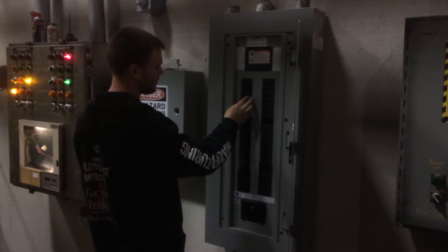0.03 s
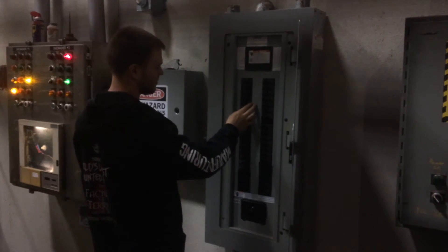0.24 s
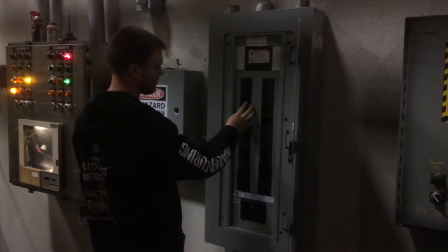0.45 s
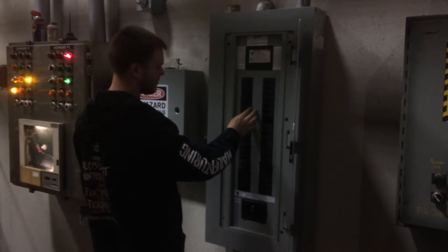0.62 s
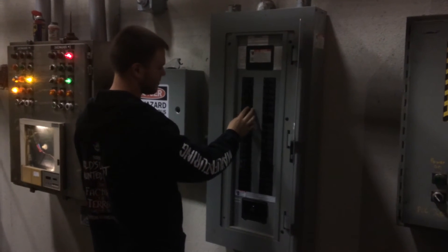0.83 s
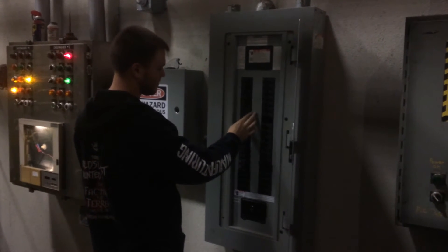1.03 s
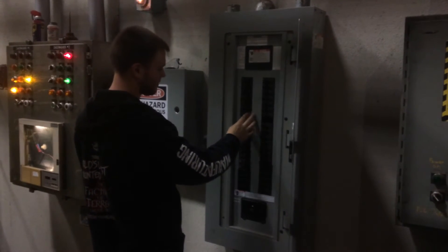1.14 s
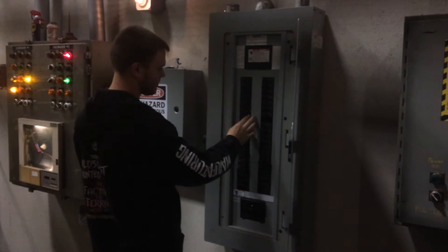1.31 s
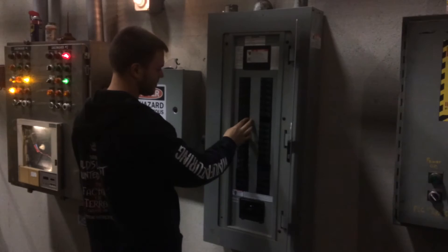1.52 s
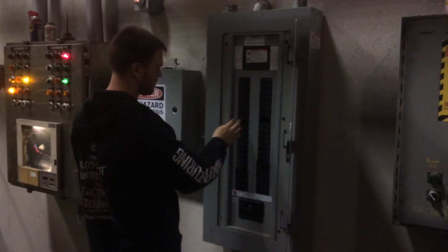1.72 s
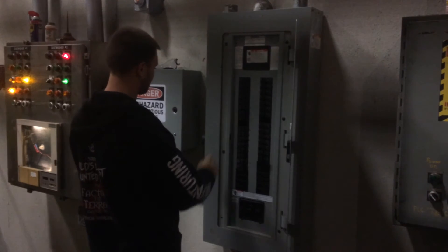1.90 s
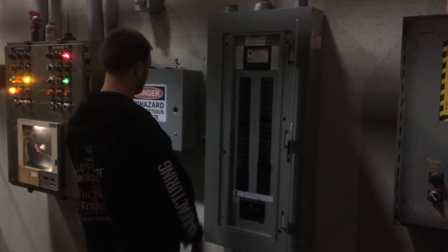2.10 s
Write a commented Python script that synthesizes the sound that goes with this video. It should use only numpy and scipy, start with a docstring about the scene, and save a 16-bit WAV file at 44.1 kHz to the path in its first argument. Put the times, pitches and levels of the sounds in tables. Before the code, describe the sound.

Five circuit breakers are flipped one after another at an even pace. Each sharp plastic clack makes the steel cabinet thump and ring faintly, with a short echo in a hard-walled room over a faint ventilation hum.

```python
"""In a hard-walled room, five circuit breakers are flipped one after another on a steel panel.
Each toggle lets go with a tick, snaps home a few milliseconds later and bounces once.
The plastic case clacks, and the steel cabinet thumps and rings.
The room answers with a short echo, over a faint ventilation hum."""
import sys
import numpy as np
from scipy import signal
from scipy.fft import rfft, irfft
from scipy.io import wavfile

SR = 44100
rng = np.random.default_rng(int(sys.argv[2]) if len(sys.argv) > 2 else 0)


def output_pcm(signal):
    """Save a mono or channel-first signal as 16-bit PCM at the path in sys.argv[1].

    Samples are clipped to [-1, 1] before scaling.
    """
    pcm = np.clip(np.atleast_2d(signal).T, -1, 1) * 32767
    wavfile.write(sys.argv[1], SR, np.round(pcm).astype(np.int16))


N = 94815

# The flips. Each row: snap time in seconds, level in dB, boosts in dB for the middle, upper middle,
# presence and top bands, bounce delay in seconds, bounce level in dB, room level in dB.
FLIPS = [(0.1148, -1, 0.5, 1.5, -0.5, 1.5, .0033, -4.5, -0.5),
         (0.4729, -1, 0, 1, -0.5, 4.5, .0016, -5.5, -2), (0.8866, -0.5, -1, -3, -2, -1, .0027, -3.5, 0),
         (1.2673, 0, 1, 1, -0.5, 0.5, .0040, -6.5, -1), (1.6294, -2, 0.5, -7, -2.5, 1, .0027, -1.5, 3.5)]
# Band centres in Hz: bass, middle, upper middle, presence, treble, top.
BAND_HZ = (400, 1500, 2800, 4800, 8200, 13000)
# Pitches that stand out, one list per breaker. Each pair: pitch in Hz, boost in dB.
RESONANCES = [
    [(2700, 5), (3650, 6), (4830, 7), (6190, 5), (7250, 4), (8230, 5)],
    [(1060, 0.5), (2670, 6), (4100, 8.5), (4950, 6), (8700, 5.5), (9400, 3)],
    [(3430, 8), (4370, 7), (4920, 5), (6800, 4), (8250, 1), (10700, 3.5)],
    [(1800, 3), (2830, 1), (5680, 8.5), (7220, 6.5), (8150, 1), (9950, 2.5)],
    [(1790, 7), (3900, 5.5), (4950, 6.5), (5330, 0), (6950, 4.5), (8850, 4)],
]
# The tone of the plastic case. Each row: pitch in Hz, level in dB.
CASE_TONE = [(150, -9.5), (600, -16), (1050, -7.5), (2000, -6), (3200, -8), (4600, -3), (8000, 2),
             (11000, 2), (15000, -3)]
# How long the case rings. Each row: pitch in Hz, fade time (to fall by 60 dB) in seconds.
CASE_FADES = [(300, 0.063), (1200, 0.057), (4000, 0.035), (14000, 0.02)]
# Clear notes that all the cases share. Each row: pitch in Hz, level in dB, fade time in seconds.
CASE_NOTES = [(1037, -32, 0.042), (1802, -37.5, 0.1), (2634, -32.5, 0.11), (4380, -32.5, 0.036),
              (4846, -31.5, 0.088), (5800, -26, 0.054), (7100, -25.5, .05), (8090, -21, 0.073),
              (8850, -39, 0.023), (10490, -21, .04), (12800, -24, 0.042)]
# The cabinet's steel. Each row: pitch in Hz, level in dB, fade time in seconds.
STEEL_NOTES = [(2760, -57, 0.64), (3470, -52, 0.72), (4790, -56, 0.71), (4930, -51, 0.87), (5800, -60, .5),
               (6030, -57.5, 0.39)]
# The cabinet flexing. Each row: start in seconds, pitch in Hz, level in dB, swell and fade in seconds.
THUMPS = [(0.125, 320, -12.5, 0.007, 0.064), (0.484, 325, -26.5, 0.0057, 0.091),
          (0.509, 165.5, -31, 0.0059, .16), (0.894, 329, -20.5, 0.0055, 0.13),
          (0.899, 166.5, -31, .012, 0.22), (1.280, 323.4, -19.5, .012, 0.1),
          (1.635, 191.8, -26, 0.0042, 0.23), (1.637, 284, -35, .010, 0.13)]
# The tone of the room's echo. Each row: pitch in Hz, level in dB.
ROOM_TONE = [(30, -17.5), (80, -1.5), (170, 3), (240, 5), (340, 11.5), (480, 0), (750, -3.5), (1100, -1.5),
             (2100, -5.5), (3100, -1.5), (4800, 1.5), (8000, 3), (10500, 2), (12500, -4), (15000, -4.5)]
# How long the room rings. Each row: pitch in Hz, fade time in seconds.
ROOM_FADES = [(100, .6), (320, 0.44), (1200, 0.36), (2800, 0.44), (4800, 0.48), (8000, .36), (14000, 0.25)]
# The tone of the rushing air. Each row: pitch in Hz, level in dB.
AIR_TONE = [(22, -29.5), (42, -10.5), (75, -5), (160, -1.5), (240, -5), (300, -7.5), (360, -8), (560, -15),
            (1000, -17), (1750, -21.5), (2700, -25), (4900, -24.5), (5600, -26), (13600, -34), (16000, -45)]
# The rush eases off at the end. Each row: time in seconds, level change in dB.
AIR_LEVELS = [(0, .5), (1.6, -0.5), (1.9, 0), (2.15, -3)]
# The ventilation's hum. Each row: pitch in Hz, level in dB.
HUM_NOTES = [(75.4, -64.5), (118, -74.5), (237, -60.5), (598, -70)]

TICK_LEAD_S = 0.0039  # the toggle lets go this long before the snap
SHORT, LONG = 4096, 32768  # samples in one clack, and in one flip with its echo


def breaker(resonances, level_db, middle_db, upper_db, presence_db, top_db, bounce_s, bounce_db, room_db):
    """One toggle ticks, snaps and bounces; the snap sets the steel and the room ringing."""
    tick, snap, bounce = (case_clack() for _ in range(3))
    snap = snap + contact_crack() + ringing_notes(CASE_NOTES)
    flip = np.zeros(LONG)
    add(flip, 0, amp(-14) * tick)
    add(flip, TICK_LEAD_S, snap)
    add(flip, TICK_LEAD_S, steel_ring())
    add(flip, TICK_LEAD_S + bounce_s, amp(bounce_db) * bounce)
    add_room_echo(flip, snap, room_db)
    tone = breaker_tone((0, middle_db, upper_db, presence_db, 0, top_db), resonances)
    return amp(level_db) * shape_tone(flip, tone)


def case_clack():
    """A knock makes the plastic case ring briefly at many pitches at once."""
    return amp(-8) * dense_ring(CASE_TONE, CASE_FADES, rise_s=0.00041, bass_lag_s=0.0066)


def contact_crack():
    """The contacts strike with a tiny burst of bright noise."""
    bright_noise = unit(np.diff(rng.standard_normal(SHORT + 1)))
    return amp(-9) * bright_noise * fade(0.01, SHORT)


def breaker_tone(band_db, resonances, width_hz=424, ripple_db=1.73, ripple_step_hz=109.6):
    """One breaker's own voice, from broad bands and narrow resonances, as rows of Hz and dB."""
    hz = np.linspace(20, SR / 2, num=1200)
    db = look_up(list(zip(BAND_HZ, band_db)), hz)
    db += sum(boost / (1 + (2 * (hz - peak_hz) / width_hz) ** 2) for peak_hz, boost in resonances)
    # A random ripple above the bass stands for countless weaker resonances.
    ripple = np.interp(hz / ripple_step_hz, np.arange(len(hz)), rng.standard_normal(len(hz)))
    return np.c_[hz, db + ripple_db * ripple * (hz > BAND_HZ[0])]


def steel_ring(copies=4):
    """The sheet steel rings in clusters of close notes that beat against each other."""
    return sum(ringing_notes(STEEL_NOTES, size=24576) for _ in range(copies)) / np.sqrt(copies)


def cabinet_thump(hz, level_db, swell_s, fade_s):
    """The cabinet flexes after a snap: one low note swells and dies."""
    t = seconds(LONG)
    swell = 1 - np.exp(-(t / swell_s) ** 2)
    return amp(level_db) * swell * fade(fade_s, LONG) * np.sin(2 * np.pi * hz * t)


def add_room_echo(flip, snap, room_db):
    """Nearby walls throw the snap back six times, and the whole room rings on."""
    for delay_s in rng.uniform(0.008, 0.028, size=6):
        add(flip, TICK_LEAD_S + delay_s, amp(room_db - 18) * rng.choice([-1, 1]) * snap)
    tail = dense_ring(ROOM_TONE, ROOM_FADES, rise_s=0.002, bass_lag_s=0.0069, size=LONG)
    add(flip, TICK_LEAD_S + 0.005, amp(room_db - 23) * tail)


def ventilation():
    """Air rushes softly under a few wavering hum notes."""
    t = seconds(N)
    air_db = -50 + np.interp(t, *np.transpose(AIR_LEVELS)) - 0.1 * drift(7.1)
    air = amp(air_db) * unit(shape_tone(rng.standard_normal(N), AIR_TONE))
    hum = np.zeros(N)
    for hz, db in HUM_NOTES:
        waver = 1 + 0.5 * drift(4.7)
        hum += amp(db) * np.sqrt(2) * waver * np.sin(2 * np.pi * hz * t + drift(2.2))
    return air + hum


def dense_ring(tone, fades, rise_s, bass_lag_s, size=SHORT, bass_hz=1100):
    """Countless notes blur into noise; each band swells and dies at its own speed."""
    t, hz = seconds(size), np.fft.rfftfreq(size, 1 / SR)
    phases = np.exp(2j * np.pi * rng.random(len(hz)))
    spectrum = rfft(unit(irfft(phases * amp(look_up(tone, hz)))))
    centres = np.geomspace(80, 15000, 14)
    ring = np.zeros(size)
    for centre, pick in zip(centres, np.eye(len(centres))):
        band = irfft(spectrum * np.interp(hz, centres, pick))
        swell_s = rise_s + bass_lag_s / (1 + (centre / bass_hz) ** 2)  # bass builds up more slowly
        ring += band * fade(look_up(fades, centre), size) * (1 - np.exp(-t / swell_s))
    return ring


def ringing_notes(notes, size=SHORT, spread_db=2, detune=0.008):
    """Pure notes die away, a little different in level and pitch at each blow."""
    t = seconds(size)
    ring = np.zeros(size)
    for hz, db, fade_s in notes:
        gain = amp(db + spread_db * rng.normal())
        pitch_hz = hz * (1 + detune * rng.normal())
        ring += gain * fade(fade_s, size) * np.sin(2 * np.pi * (pitch_hz * t + rng.random()))
    return ring


def shape_tone(sound, tone, size=4096):
    """Filters a sound by rows of Hz and dB, with no ringing ahead of a hit."""
    log_gain = np.log(amp(look_up(tone, abs(np.fft.fftfreq(size, 1 / SR)))))
    response = np.exp(np.conj(signal.hilbert(log_gain)))
    taps = np.fft.ifft(response).real[:size // 2]
    return signal.fftconvolve(sound, taps)[:len(sound)]


def drift(rate_hz):
    """A slow random wobble."""
    hz = np.fft.rfftfreq(N, 1 / SR)
    return unit(irfft(rfft(rng.standard_normal(N)) * np.exp(-(hz / rate_hz) ** 2), N))


def fade(fade_s, size):
    """Falls by 60 dB every fade_s seconds."""
    return np.exp(-np.log(1000) * seconds(size) / fade_s)


def seconds(size):
    """The time of each sample."""
    return np.arange(size) / SR


def amp(db):
    """Turns decibels into a gain."""
    return 10 ** (np.asarray(db) / 20)


def unit(sound):
    """Scales to an average (rms) level of 1."""
    return sound / np.sqrt(np.mean(sound ** 2) + 1e-20)


def look_up(table, hz):
    """Reads between a table's rows on a musical (log) pitch scale."""
    pitches, values = np.transpose(table)
    return np.interp(np.log(hz + 1), np.log(pitches + 1), values)


def add(mix, start_s, sound):
    """Mixes a sound in at the given time."""
    part = mix[max(round(start_s * SR), 0):][:len(sound)]
    part += sound[:len(part)]


def scene():
    """Five flips and their thumps over the ventilation, in mono."""
    mix = ventilation()
    for (snap_s, *settings), resonances in zip(FLIPS, RESONANCES):
        add(mix, snap_s - TICK_LEAD_S, breaker(resonances, *settings))
    for start_s, *settings in THUMPS:
        add(mix, start_s, cabinet_thump(*settings))
    return mix[None]


def record(dry):
    """Cuts the highest treble, above 15270 Hz."""
    taps = signal.firwin(401, 15270, window=("kaiser", 8), fs=SR)
    return signal.oaconvolve(dry, taps[None], "same")


dry = scene()
out = record(dry)
output_pcm(out)
```